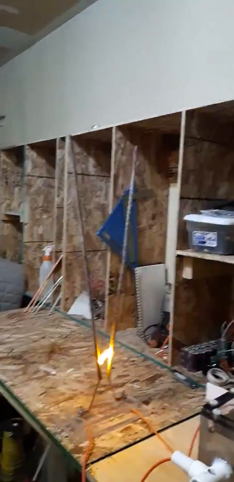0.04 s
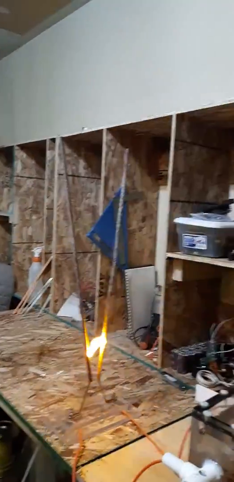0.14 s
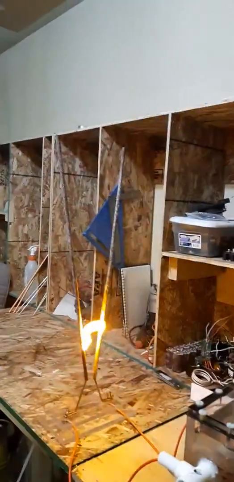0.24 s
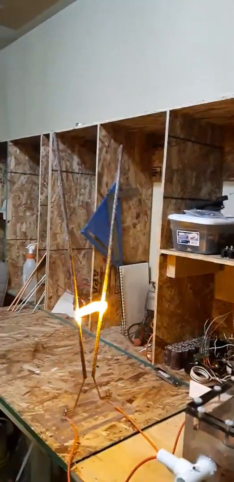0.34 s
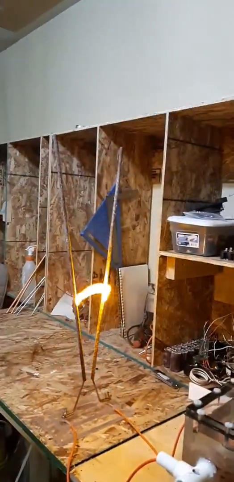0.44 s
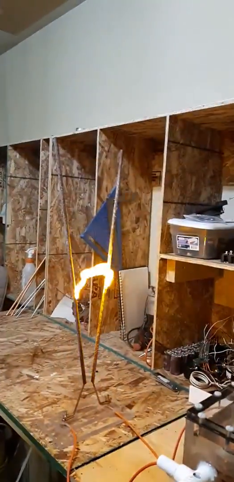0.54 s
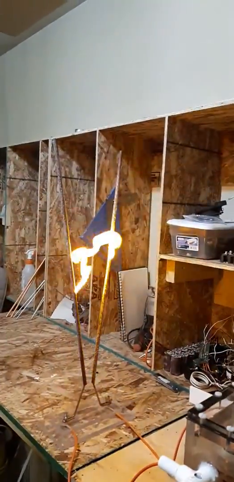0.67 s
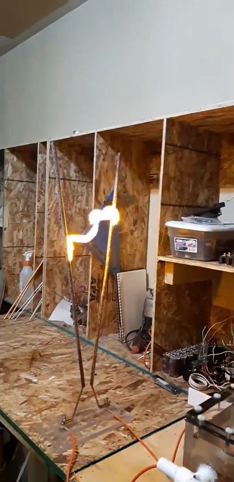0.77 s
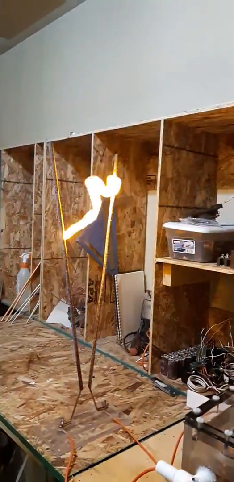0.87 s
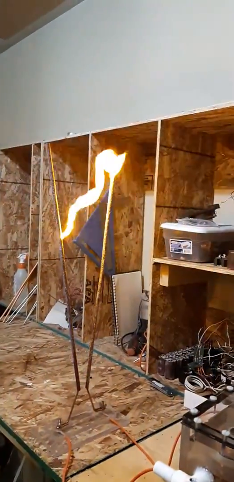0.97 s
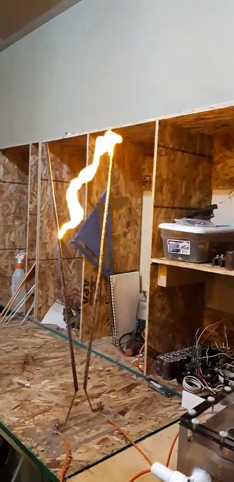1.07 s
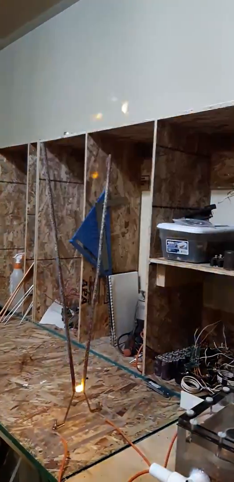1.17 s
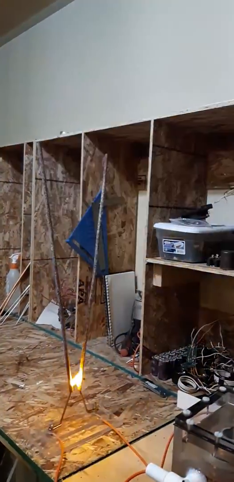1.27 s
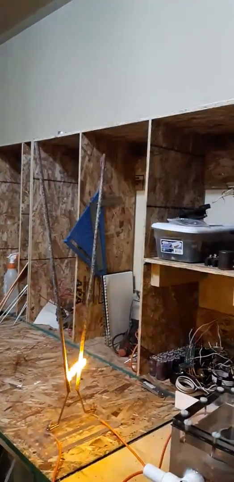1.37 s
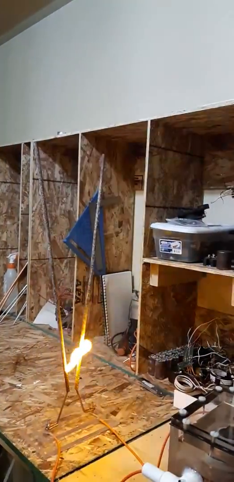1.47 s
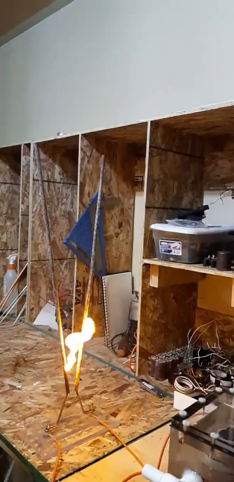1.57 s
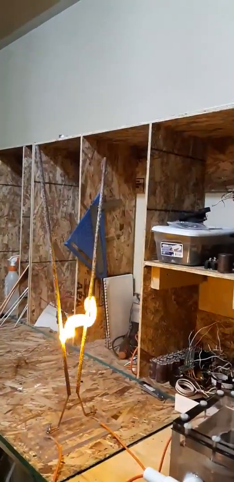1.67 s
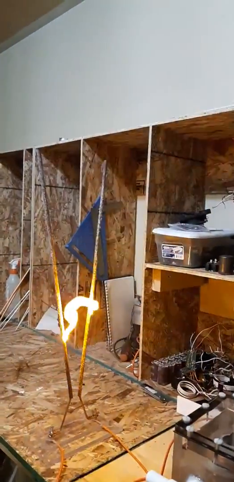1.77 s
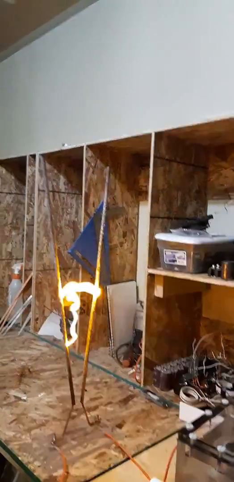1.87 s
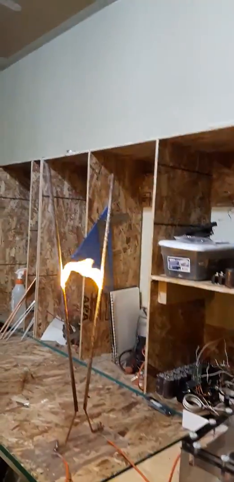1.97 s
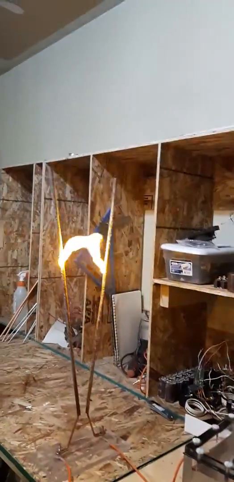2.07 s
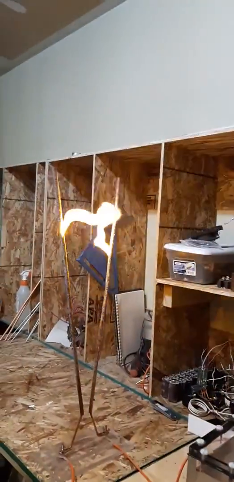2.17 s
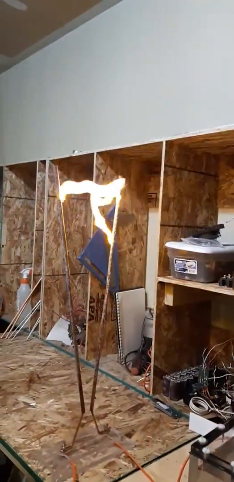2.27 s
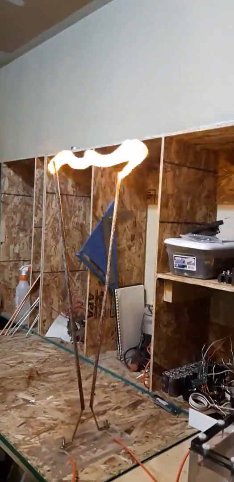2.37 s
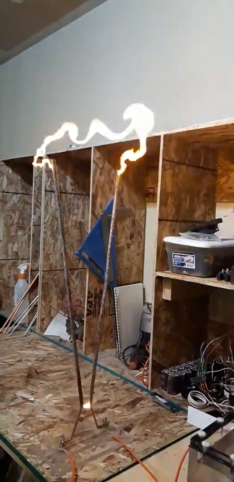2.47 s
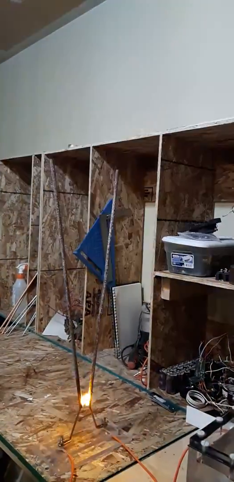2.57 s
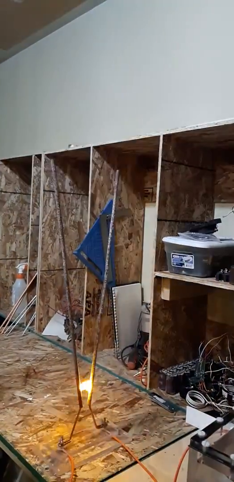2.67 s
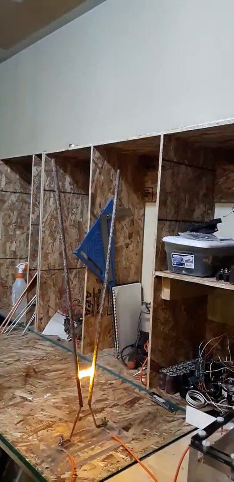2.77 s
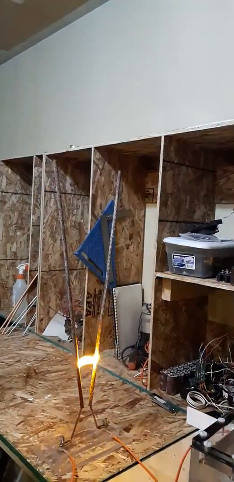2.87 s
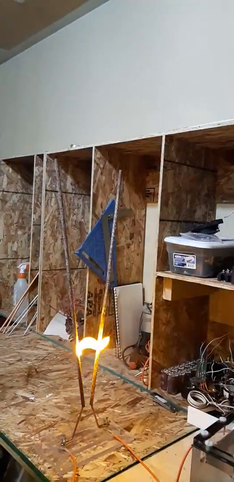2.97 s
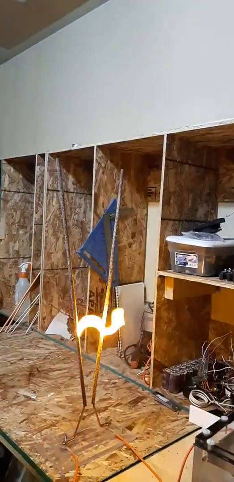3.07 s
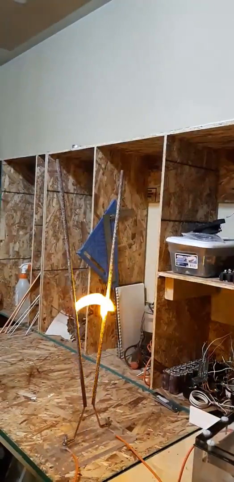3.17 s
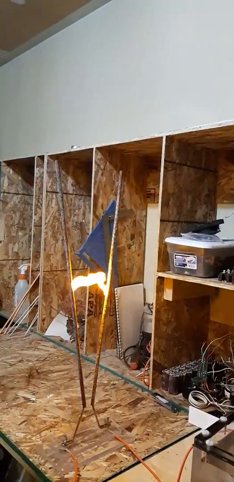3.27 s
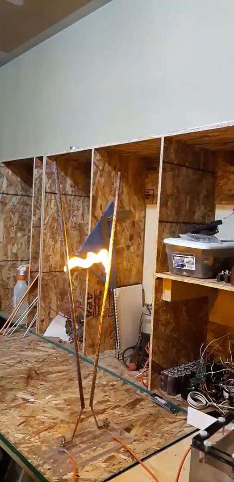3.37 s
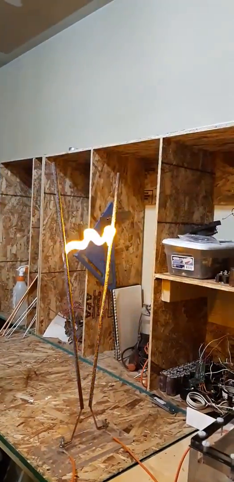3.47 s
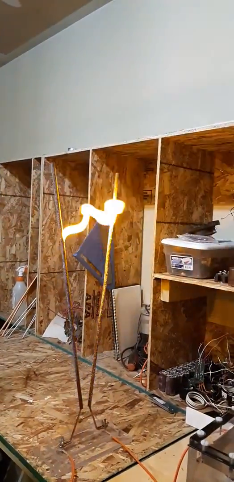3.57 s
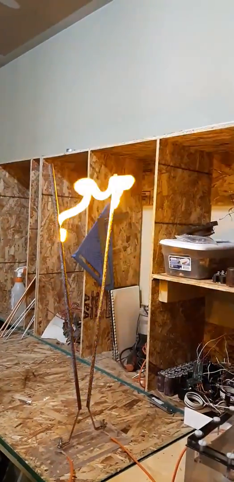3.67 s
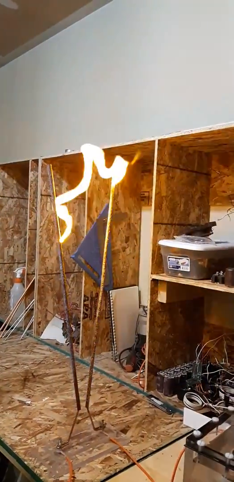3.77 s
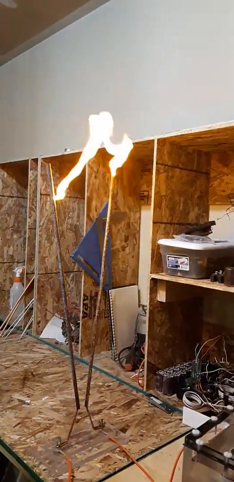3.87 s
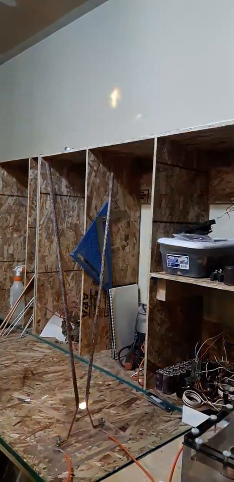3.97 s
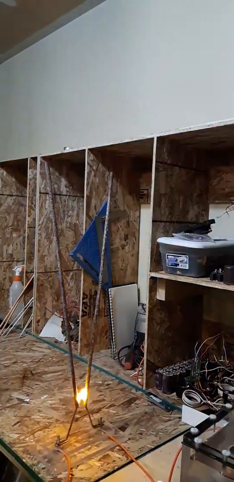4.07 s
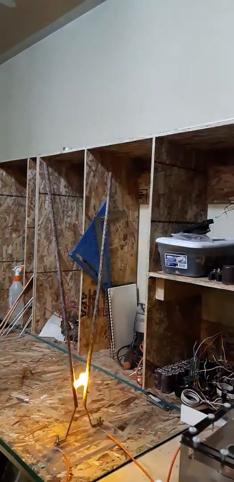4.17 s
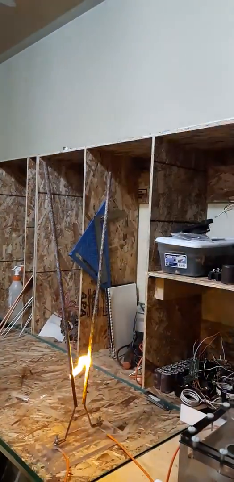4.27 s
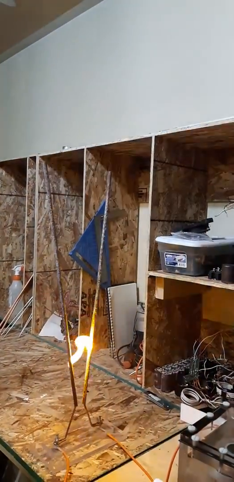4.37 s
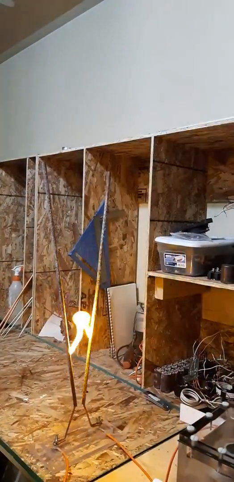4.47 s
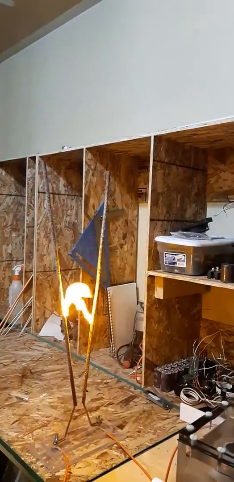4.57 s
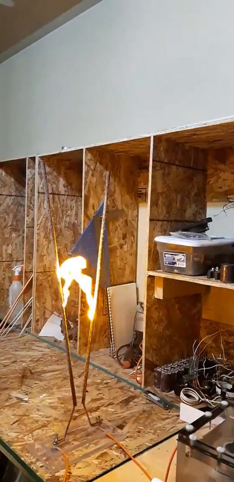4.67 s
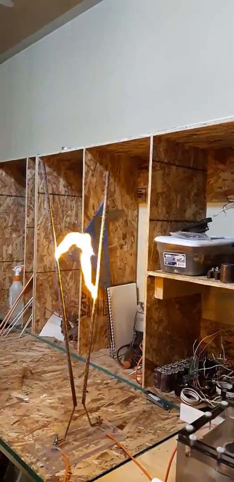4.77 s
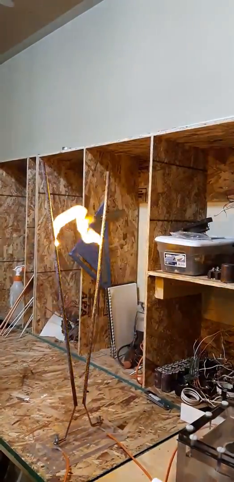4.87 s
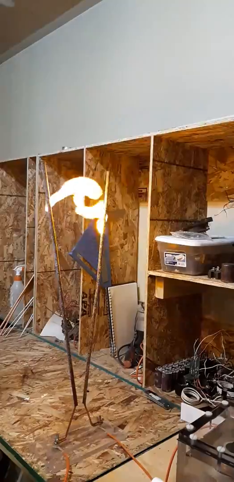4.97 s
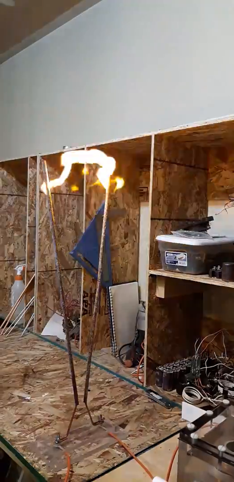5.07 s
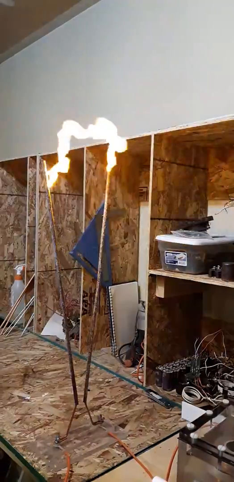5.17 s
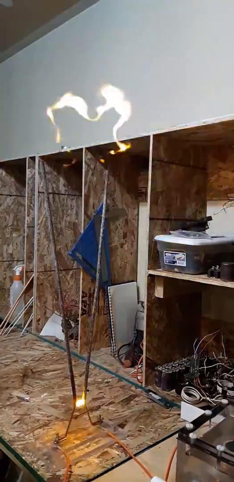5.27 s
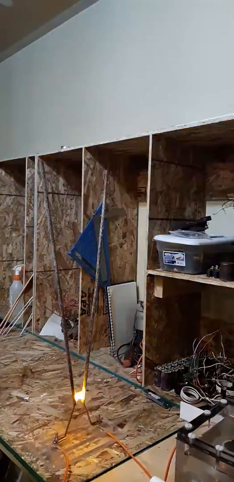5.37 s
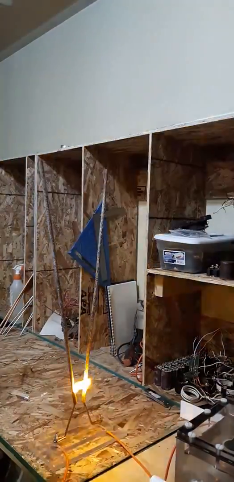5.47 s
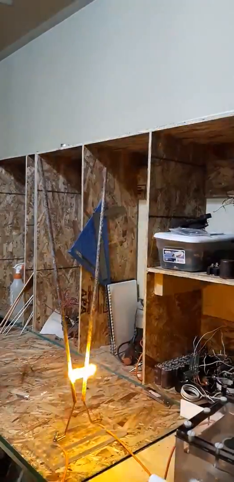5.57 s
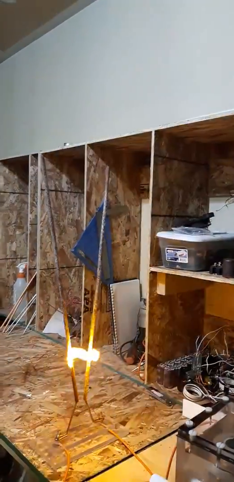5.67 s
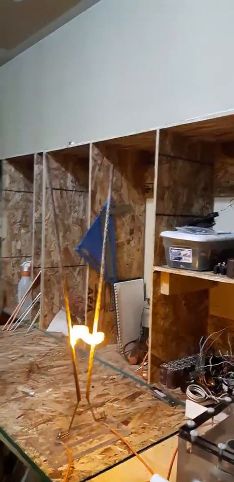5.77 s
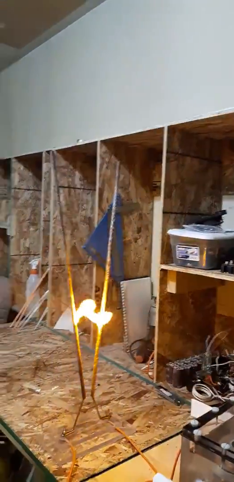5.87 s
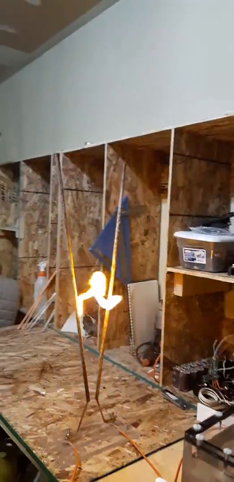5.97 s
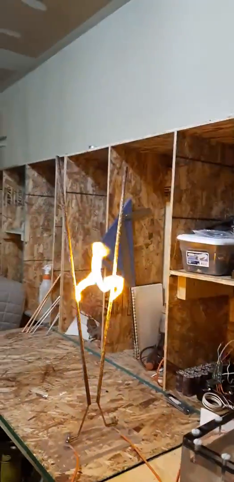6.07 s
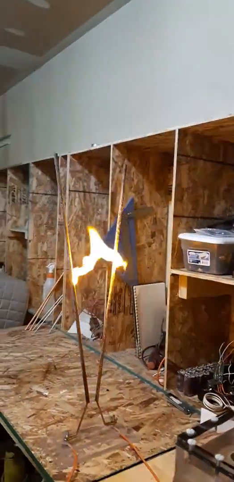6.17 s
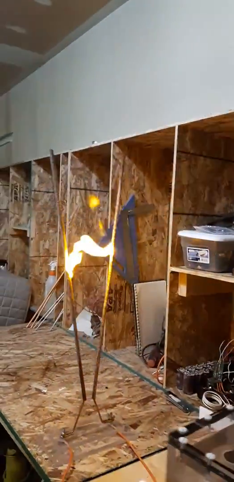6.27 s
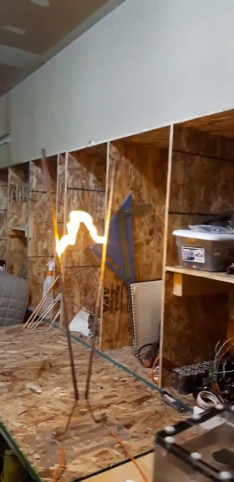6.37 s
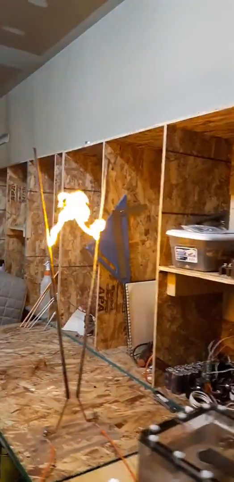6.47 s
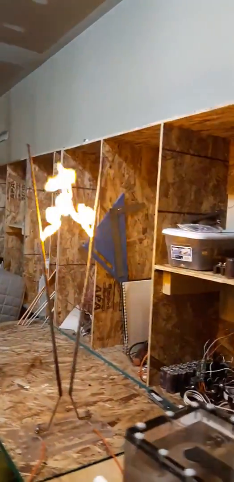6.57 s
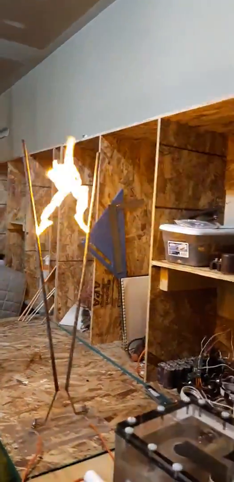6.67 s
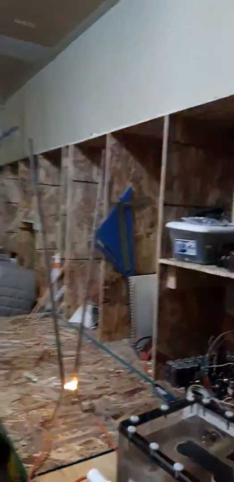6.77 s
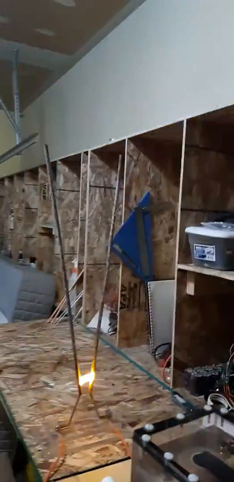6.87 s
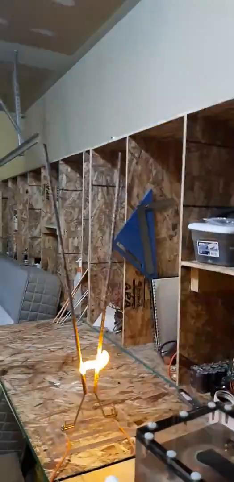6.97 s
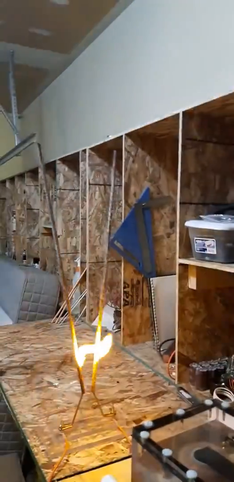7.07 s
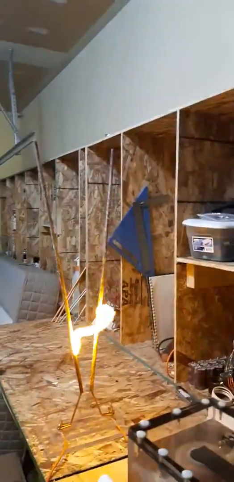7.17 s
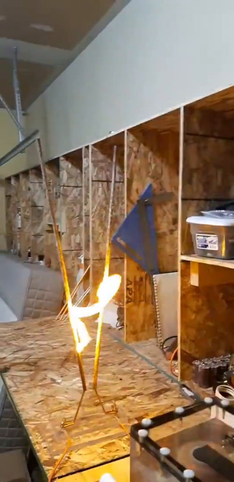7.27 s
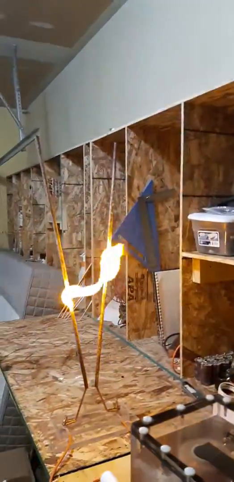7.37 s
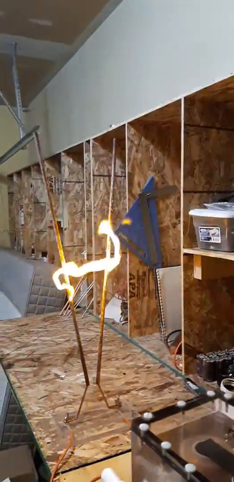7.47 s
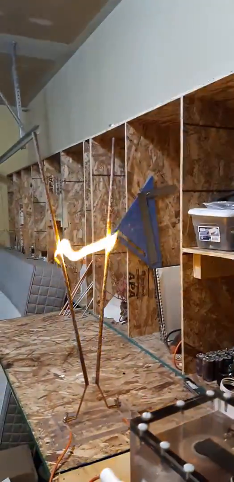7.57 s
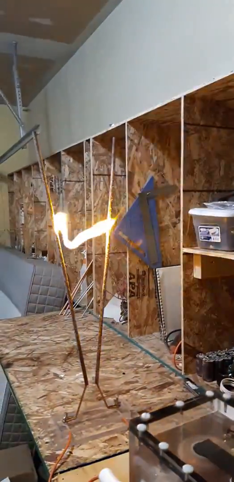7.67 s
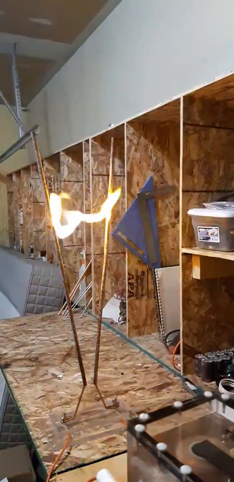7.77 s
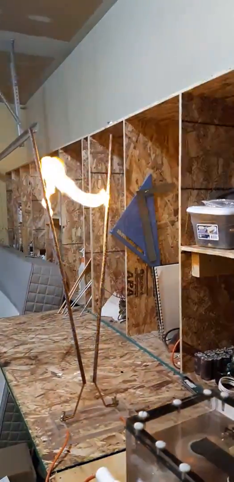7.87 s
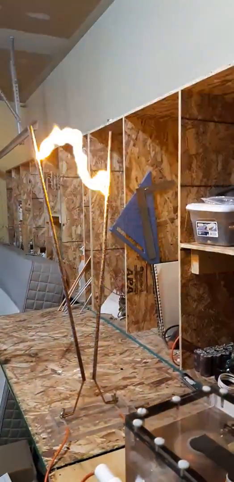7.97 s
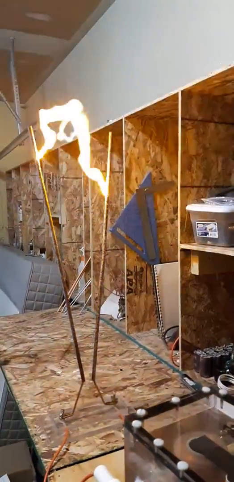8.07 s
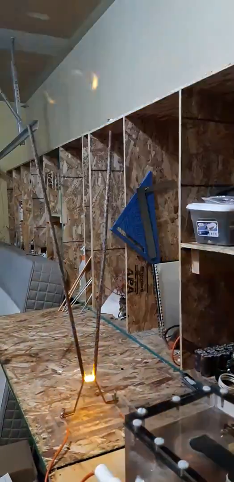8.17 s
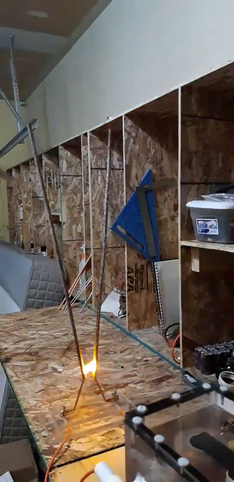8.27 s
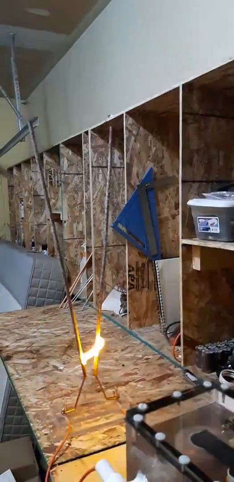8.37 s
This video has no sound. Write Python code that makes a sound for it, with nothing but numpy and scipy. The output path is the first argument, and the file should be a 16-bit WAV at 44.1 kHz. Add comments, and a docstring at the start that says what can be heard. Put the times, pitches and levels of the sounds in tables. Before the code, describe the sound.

A high-voltage arc climbs two metal rods in a workshop. It sizzles and ticks, then crackles and snaps irregularly, with a flame-like flutter and low buzzing growl as it stretches. It breaks and fires again with a sharp bang that overloads the nearby microphone and rings briefly in the room. This happens six times, about one and a half seconds apart, over a faint mains hum.

```python
"""Over a faint mains hum, a high-voltage arc is climbing two diverging rods on a wooden workshop bench.
Its feet hiss and tick on the metal, and its channel crackles and snaps as loops short out.
As it lengthens it flutters like a flame and growls with the supply's ripple, until it breaks.
The narrow gap then fires again with a bang that overloads the microphones and rings through the room,
and the next climb begins. The arc restrikes six times, about 1.4 s apart."""
import sys
import numpy as np
from scipy import signal
from scipy.fft import rfft, irfft, next_fast_len
from scipy.io import wavfile
from scipy.ndimage import uniform_filter1d

SR = 44100
rng = np.random.default_rng(int(sys.argv[2]) if len(sys.argv) > 2 else 0)


def wrap_up_sound(samples):
    """Save the sound to the file named by the first command line argument, as 16-bit audio."""
    columns = np.atleast_2d(samples).T
    # keep every value between -1 and 1, then stretch to whole-number steps
    tamed = np.clip(columns, -1, 1)
    steps = np.round(tamed * 32767).astype(np.int16)
    wavfile.write(sys.argv[1], SR, steps)


N = 371772
TIME = np.arange(N) / SR
RIPPLE_HZ = 120
MIC_LAG_MS, MIC_SPACING_MS = 0.11, 0.26

# steady noise of the workshop: frequency_hz, density_db
BACKGROUND_SPECTRUM = [(25, -9), (60, -8), (110, -4.5), (170, -7.5), (400, -21), (1500, -17.5),
                       (16000, -78)]
# each climb starts with a bang at the narrow gap and lasts until the next:
# start_s, bang_db, sizzle_db, fizz_db, short_arc_flutter_db, long_arc_flutter_db
ARC_CLIMBS = [(-0.2, 6, -62.5, -53, -76.5, -56), (1.154, 7.5, -60, -52.5, -72.5, -64.5),
              (2.4762, 6.5, -61.5, -53, -77.5, -64.5), (3.9454, 2.5, -61.5, -55, -78.5, -54),
              (5.263, 5.5, -62.5, -54, -76.5, -56.5), (6.7086, 8.5, -61.5, -51, -70.5, -54),
              (8.1448, 7, -66, -46, -74, -56)]
# the feet glide smoothly and the frying dies down: middle_s, half_width_s, dip_db
GLIDE_LULLS = [(0.24, 0.06, 0.5), (0.52, 0.047, 6.5), (1.57, 0.051, 2.5), (2.42, 0.031, 8), (3.0, 0.065, 1),
               (3.62, 0.15, 5), (4.32, 0.066, 6.5), (5.19, 0.06, 2), (5.72, 0.074, 2.5), (8.05, 0.13, 4)]
# a foot of the arc catches on the metal: start_s, hold_s, sizzle_db, fizz_db, crackle_db
FRYING_SPURTS = [(-0.02, 0.013, -55, -48, -52.5), (0.056, 0.037, -62, -49.5, -57.5),
                 (0.576, 0.072, -53, -46.5, -66), (0.927, 0.27, -60, -48.5, -53),
                 (1.379, 0.12, -54.5, -48.5, -83), (2.172, 0.051, -54, -44.5, -56),
                 (2.6, 0.062, -59, -61, -60), (2.776, 0.045, -53, -53, -63), (3.848, 0.24, -64, -56, -57.5),
                 (4.483, 0.11, -71, -51, -85), (5.926, 0.2, -66, -50, -78), (6.47, 0.1, -63, -43, -49.5),
                 (6.797, 0.23, -55, -45, -52.5), (7.18, 0.12, -78, -47, -83), (7.485, 0.16, -54, -56, -58),
                 (7.792, 0.039, -60, -62, -55), (8.364, 0.08, -56.5, -57, -79)]
# flutter of the hot plume: frequency_hz, density_db
PLUME_SPECTRUM = [(30, -34), (60, -15), (98, 5), (135, -7.5), (195, 0), (255, 8.5), (335, -0.5), (420, -15),
                  (720, 1), (1400, -22.5), (4000, -36)]
# reflections from bench, shelves and walls: left_delay_ms, right_delay_ms, level_db
REFLECTIONS = [(1.364, 1.235, -4.5), (2.347, 3.9, -15), (6.045, 14, -11.5), (10.65, 9.9, -7.5),
               (22.4, 12, -23)]
# reverberation of the workshop: frequency_hz, level_db, t60_s
REVERB_BANDS = [(50, 4, 0.58), (133, -12, 0.63), (229, 9, 0.37), (348, 1, 0.54), (736, 1.5, 0.47),
                (1090, -1.5, 0.58), (1880, 5, 0.39), (2760, -4.5, 0.54), (3550, -.5, 0.48),
                (7860, -0.5, 0.44), (14900, 6, 0.24)]
# loops of the arc short out: start_s, crack_db, thump_db
LOOP_SNAPS = [(0.6952, -16.5, -10), (0.8512, -25, -18), (0.926, -15, -11), (0.9449, -13.5, -25),
              (1.019, -2, -17), (1.6148, -26, -11.5), (1.7078, -21.5, -19.5), (1.8785, -51, -8),
              (2.1632, -26.5, -40), (2.2482, -14.5, -8.5), (2.2854, -41, -4.5), (2.3319, -20.5, -34),
              (3.1007, -19, -17), (3.334, -29, -39), (3.596, -27, -35), (3.7044, -21.5, -18),
              (3.7455, -23, -45.5), (3.8209, -13.5, -16), (3.894, -15.5, -9), (4.5293, -23.5, -28),
              (4.6708, -26, -31), (4.7105, -23, -19), (4.8288, -7.5, -16), (5.0576, -4.5, -6),
              (6.0766, -17.5, -13.5), (6.136, -17.5, -20), (6.2545, -5, -11.5), (6.4615, -9, -7.5),
              (6.506, -22, -8), (6.543, -13, -9), (6.5717, -0.5, -3.5), (6.6697, -4, -3),
              (7.1335, -23, -15), (7.2916, -21, -11.5), (7.3488, -23.5, -20), (7.4386, -20.5, -25),
              (7.466, -7.5, -11), (7.4998, -14, -16), (7.6471, -21.5, -17), (7.7542, -12, -13),
              (7.8, -18.5, -5), (7.8275, -11, -15), (7.9418, -33, 0.5), (8.0469, -21.5, -2.5),
              (8.291, -15.5, -19)]
# discharges picked up electrically: start_s, level_db
PICKUP_SPIKES = [(0.9918, -1.5), (2.8986, 2.5)]
# response of the two microphones: frequency_hz, left_db, right_db
MIC_RESPONSE = [(30.8, -9.5, -5.5), (81.5, -1, 0.5), (308, -1, 0), (970, 0, -1.5), (2000, 1, -1),
                (3300, -0.5, 1.5), (4810, -7, 6), (5414, -13, -2), (7480, -31.5, -18), (10060, -19, -11),
                (11630, -16.5, -13), (13800, -13, -45), (16400, -9, -3)]


def from_db(db):
    """Amplitude grows tenfold with every 20 dB."""
    return 10 ** (np.asarray(db) / 20)


def rms_one(x):
    """Normalisation to unit power."""
    return x / np.sqrt(np.mean(x ** 2) + 1e-20)


def at_hz(rows, hz):
    """Interpolation of a table's columns on a log-frequency axis."""
    points, *columns = np.transpose(rows)
    return np.array([np.interp(np.log(np.maximum(hz, 1)), np.log(points), c) for c in columns])


def band(x, low_hz, high_hz, order=2):
    """Causal band-pass filtering."""
    return signal.sosfilt(signal.butter(order, [low_hz, high_hz], "band", fs=SR, output="sos"), x + 1e-18)


def colour(x, rows):
    """Minimum-phase filtering: folding the cepstrum makes a table's dB response causal."""
    size = next_fast_len(N + SR // 2)
    hz = np.arange(size // 2 + 1) * SR / size
    cepstrum = irfft(np.log(from_db(at_hz(rows, hz))), size)
    cepstrum[:, 1:size // 2] *= 2
    cepstrum[:, size // 2 + 1:] = 0
    return irfft(rfft(x, size) * np.exp(rfft(cepstrum)), size)[:, :N]


def delayed(x, ms):
    """Propagation delay along a steady or changing path."""
    lag = np.round(np.abs(ms) * SR / 1000).astype(int)
    return x[np.clip(np.arange(N) - lag, 0, N - 1)]


def drift(rate_hz):
    """Random modulation: interpolated noise of unit power."""
    return rms_one(np.interp(TIME * rate_hz, np.arange(N // 20), rng.standard_normal(N // 20)))


def clicks(times, levels_db):
    """An impulse train, one impulse for each event."""
    index = np.round(np.asarray(times) * SR).astype(int)
    heard = (index >= 0) & (index < N)
    return np.bincount(index[heard], from_db(levels_db)[heard], N)


def discharges(per_s, spread_db):
    """Shot noise: tiny sparks at independent moments, most weak and a few strong."""
    sizes = from_db(spread_db * np.minimum(rng.exponential(1, N), 4))
    return sizes * (rng.random(N) < per_s / SR)


def room_tone():
    """Superposition of a faint mains hum and steady low noise."""
    hum = from_db(-75) * np.sin(2 * np.pi * RIPPLE_HZ * TIME) * from_db(0.42 * drift(rate_hz=6.45))
    return hum + from_db(-67.5) * rms_one(colour(rng.standard_normal(N), BACKGROUND_SPECTRUM))


def arc_length(last_climb_s=1.7, stretch_power=2.06):
    """Power-law growth: gives the climb's index and the arc's length, 0 to 1, fastest near the top."""
    starts = np.transpose(ARC_CLIMBS)[0]
    climb = np.maximum(np.searchsorted(starts, TIME, side="right") - 1, 0)
    durations = np.append(np.diff(starts), last_climb_s)
    return climb, np.clip((TIME - starts[climb]) / durations[climb], 0, 1) ** stretch_power


def lulls():
    """Attenuation in dB: a bell-shaped dip whenever the feet glide smoothly."""
    return sum(db * np.exp(-((TIME - s) / width_s) ** 2) for s, width_s, db in GLIDE_LULLS)


def with_spurts(steady_db, attack_s=0.016, release_s=0.055):
    """Incoherent sources add in power: gains of sizzle, fizz and crackle with their spurts on top."""
    power = from_db(steady_db) ** 2
    for start_s, hold_s, *levels_db in FRYING_SPURTS:
        envelope = np.interp(TIME - start_s, np.cumsum([0, attack_s, hold_s, release_s]), [0, 1, 1, 0])
        power += np.outer(from_db(levels_db), envelope) ** 2
    return np.sqrt(power)


def frying():
    """Shot noise in bands: sizzle, spits and fizz at the rods, crackle along the growing channel."""
    climb, length = arc_length()
    sizzle_db, fizz_db = np.transpose(ARC_CLIMBS)[2:4, climb]
    dip_db = lulls()
    # over a climb, sizzle and fizz fall by 1 dB while crackle rises
    hiss_gain, fizz_gain, crackle_gain = with_spurts(
        [sizzle_db - length - dip_db, fizz_db - length - dip_db / 2, -73.5 + 10.5 * length - dip_db])
    sizzle = rms_one(band(discharges(per_s=6000, spread_db=5), 3680, 6700, order=1))
    spits = rms_one(band(discharges(per_s=85, spread_db=1.9), 1100, 8000, order=1))
    hiss = (sizzle + from_db(-2) * spits) * from_db(1.8 * drift(rate_hz=90))
    fizz = rms_one(band(discharges(per_s=5000, spread_db=3), 8500, 18000))
    fizz *= from_db(2.3 * drift(rate_hz=50))
    crackle = rms_one(band(discharges(per_s=800, spread_db=5.5), 554, 3580, order=1))
    return hiss_gain * hiss + fizz_gain * fizz + crackle_gain * crackle


def plume_flutter():
    """Amplitude-modulated noise: the hot plume flutters more strongly as the arc lengthens."""
    climb, length = arc_length()
    short_db, long_db = np.transpose(ARC_CLIMBS)[4:, climb]
    settled_db = short_db - 2.1 * lulls()  # a short arc's plume settles in a lull too
    level_db = settled_db * (1 - length) + long_db * length
    noise = rms_one(colour(rng.standard_normal(N), PLUME_SPECTRUM)[0])
    return noise * from_db(level_db + 2.9 * drift(rate_hz=71))


def diffuse_field(t):
    """A diffuse field is coherent in the bass at two close points: gives its noise and decaying tail."""
    hz = np.arange(len(t) // 2 + 1) * SR / len(t)
    coherence = .97 / (1 + (2 * np.pi * hz * MIC_SPACING_MS / 1000) ** 2)
    mid, side = np.sqrt(len(t)) * np.exp(2j * np.pi * rng.random((2, len(hz))))
    spectrum = np.sqrt((1 + coherence) / 2) * mid + np.sqrt((1 - coherence) / 2) * side * [[1], [-1]]
    edges_hz = np.geomspace(30, 20000, 22)
    tail = 0
    for low, high in zip(edges_hz, edges_hz[1:]):
        level_db, t60_s = at_hz(REVERB_BANDS, np.sqrt(low * high))
        noise = irfft(spectrum * ((hz >= low) & (hz < high)), len(t))
        tail += noise * from_db(level_db - 60 * t / t60_s)
    return irfft(spectrum, len(t)), tail


def workshop(x, scatter_db=-23, scatter_s=0.0081, reverb_db=-30.5, onset_s=0.012):
    """Multipath propagation: direct sound, reflections, scatter from the shelves, then reverberation."""
    t = np.arange(SR * 3 // 4) / SR
    out = np.array([x, delayed(x, MIC_LAG_MS)])
    for left_ms, right_ms, level_db in REFLECTIONS:
        sway_ms = .45 * drift(rate_hz=5)  # paths shift as the arc sways
        out += from_db(level_db) * np.array([delayed(x, ms + sway_ms) for ms in (left_ms, right_ms)])
    # the moving arc feeds four sets of paths through the room in ever-changing shares
    shares = np.array([drift(rate_hz=5) for _ in range(4)])
    for share in shares / np.linalg.norm(shares, axis=0):
        field, tail = diffuse_field(t)
        scatter = from_db(scatter_db) * field * np.exp(-(t / scatter_s) ** 2)
        reverb = from_db(reverb_db) * tail * (1 - np.exp(-t / onset_s))
        out += signal.fftconvolve((share * x)[None], scatter + reverb, axes=1)[:, :N]
    return out


def foot_ticks():
    """Direct sound alone: dry ticks as the feet hop up the rods, strongest at half the arc's length."""
    _, length = arc_length()
    hops = discharges(per_s=34, spread_db=2.3) * np.sqrt(np.abs(np.sin(np.pi * length)))
    ticks = -from_db(-27) * band(hops, 1800, 15000, order=1)
    return np.array([ticks, delayed(ticks, MIC_LAG_MS)])


def faint_snaps(per_s=7, spread_db=3.5):
    """A jittered sequence of weak sparks: start_s, crack_db, thump_db."""
    jitter = rng.standard_normal((100, 3))
    times = (np.arange(len(jitter)) + .5 * jitter[:, 0]) / per_s
    return np.column_stack([times, [-31, -35.5] + spread_db * jitter[:, 1:]])


def sparks(rarefaction_s=.00045):
    """Thermal expansion: a snap or bang is a sharp compression, a softer rarefaction and a dull push."""
    bangs = [(start_s, db, db - 0.7) for start_s, db, *_ in ARC_CLIMBS]
    times, crack_db, thump_db = np.vstack([faint_snaps(), LOOP_SNAPS, bangs]).T
    rarefaction = band(clicks(times + rarefaction_s, crack_db - 5), 60, 940, order=1)
    crack = from_db(5.5) * band(clicks(times, crack_db) - rarefaction, 183, 8300, order=1)
    thump = from_db(4.5) * band(clicks(times, thump_db), 122, 590, order=1)
    return -(crack + band(thump, 45, 1490))


def growl(long_arc_db=-50.5, rise_db=42):
    """Forced oscillation: the supply's ripple pumps the long hot channel at its second harmonic."""
    _, length = arc_length()
    gain = uniform_filter1d(from_db(long_arc_db - rise_db * (1 - length)), size=400)
    gain *= from_db(1.9 * drift(rate_hz=21))
    return gain * np.sin(2 * np.pi * 2 * RIPPLE_HZ * TIME + 0.37 * drift(rate_hz=12))


def pickup(ring_hz=4500, ring_s=0.00015, swing_hz=182, swing_s=0.00072):
    """Electrical coupling has no echo: the input rings briefly, then swings back to rest."""
    t = TIME[:SR // 50]
    ring = np.sin(2 * np.pi * ring_hz * t) * t / ring_s * np.exp(1 - t / ring_s)
    swing = from_db(-10.5) * np.sin(2 * np.pi * swing_hz * t) * np.exp(-t / swing_s)
    spikes = signal.fftconvolve(clicks(*np.transpose(PICKUP_SPIKES)), ring + swing)[:N]
    return band(spikes, 67, 16000) * from_db([[-36], [-1.5]])  # almost all on the right


def bang_edges():
    """Shock fronts: the narrow gap fires faster than a loop shorts, so its crack has more treble."""
    times, bang_db = np.transpose(ARC_CLIMBS)[:2]
    return -band(clicks(times, bang_db), 7950, 17600)


def scene():
    """Superposition: airborne sounds pass through the microphones; electrical pickup bypasses them."""
    arc = workshop(sparks() + bang_edges() + frying() + plume_flutter())
    return colour(arc + room_tone() + foot_ticks() + growl(), MIC_RESPONSE) + pickup()


def record(dry):
    """Saturation: the bangs overload the input, and a steep low-pass cuts the highest treble."""
    cutoff_hz = 15850
    return signal.sosfilt(signal.ellip(10, .1, 80, cutoff_hz, fs=SR, output="sos"), np.tanh(dry))


dry = scene()
out = record(dry)
wrap_up_sound(out)
```